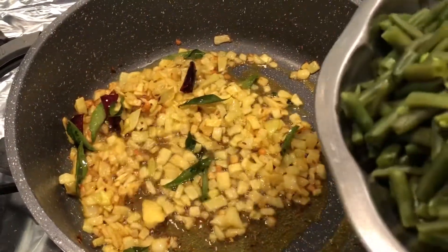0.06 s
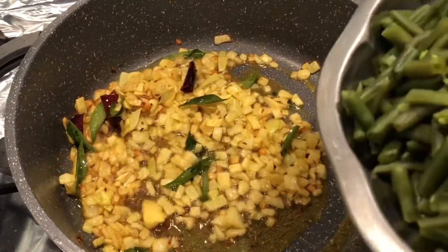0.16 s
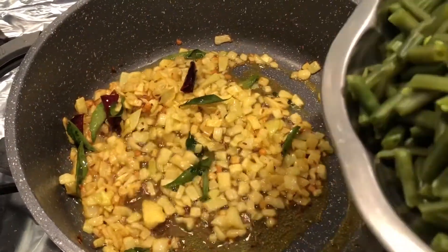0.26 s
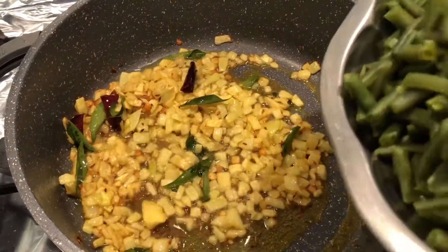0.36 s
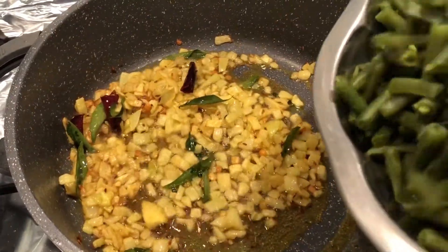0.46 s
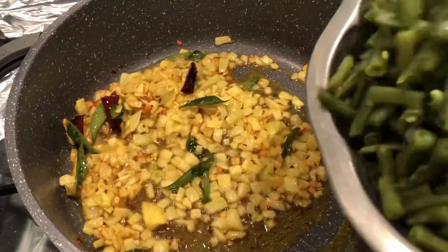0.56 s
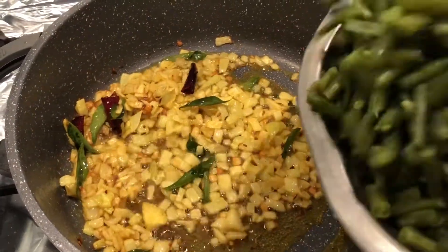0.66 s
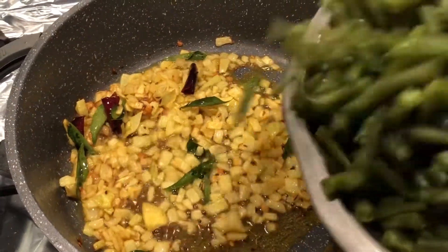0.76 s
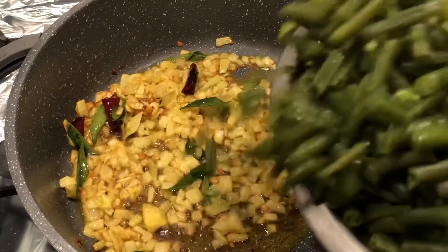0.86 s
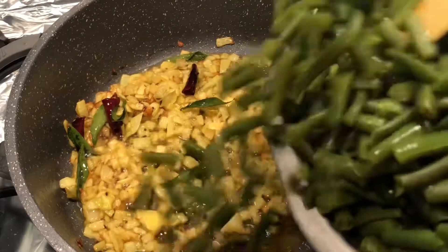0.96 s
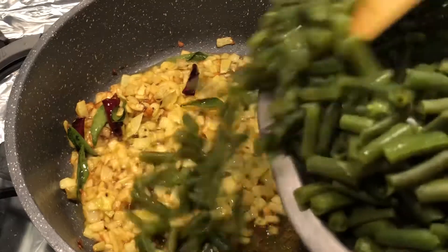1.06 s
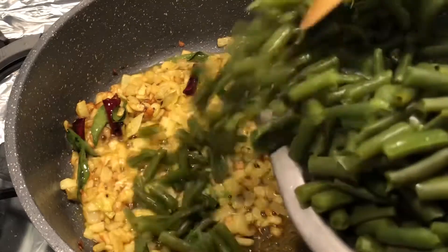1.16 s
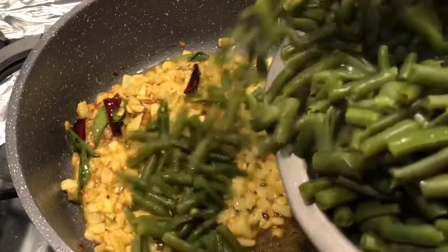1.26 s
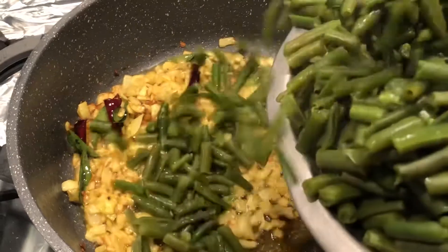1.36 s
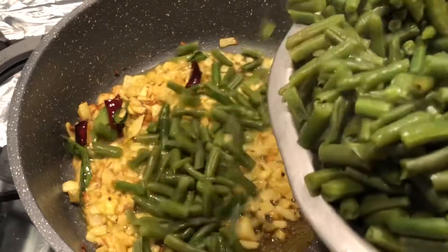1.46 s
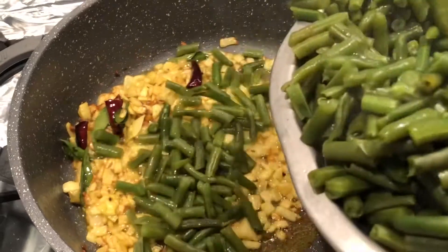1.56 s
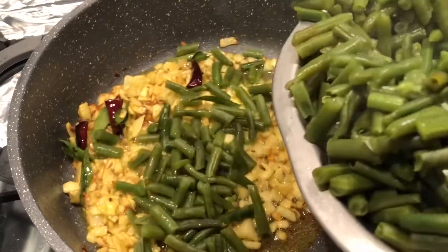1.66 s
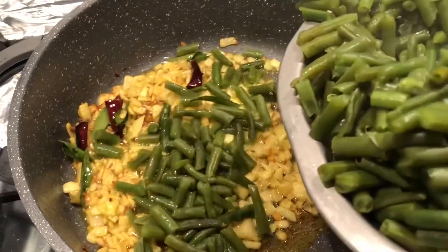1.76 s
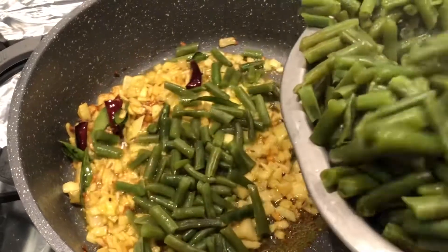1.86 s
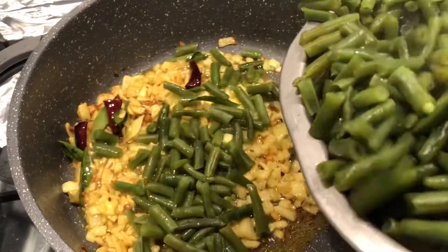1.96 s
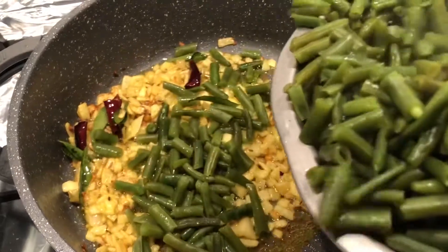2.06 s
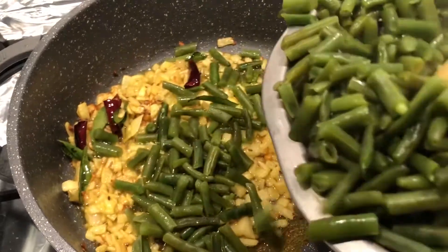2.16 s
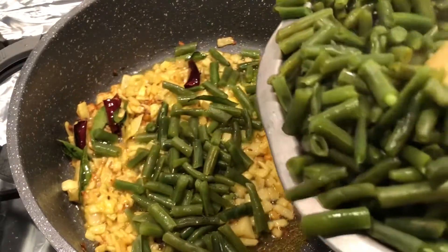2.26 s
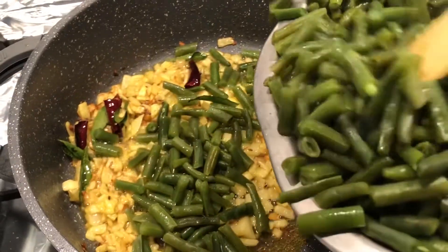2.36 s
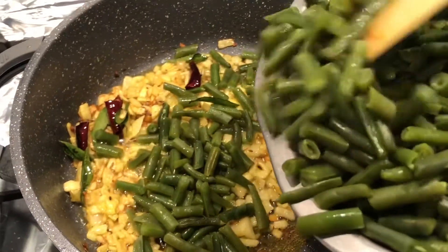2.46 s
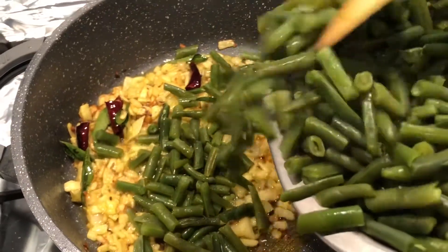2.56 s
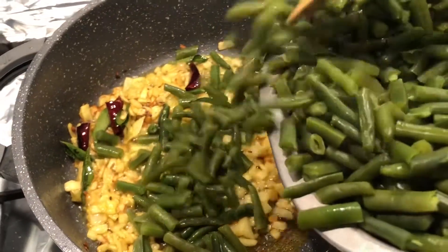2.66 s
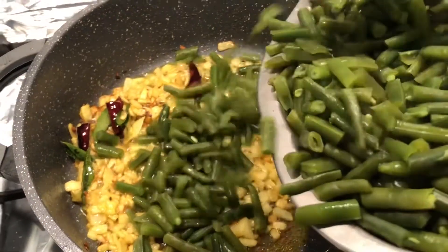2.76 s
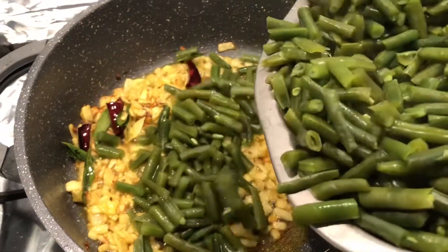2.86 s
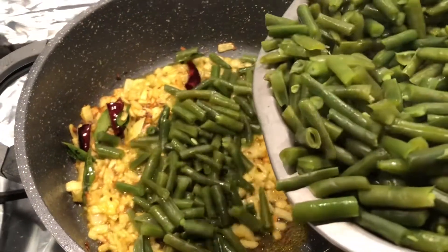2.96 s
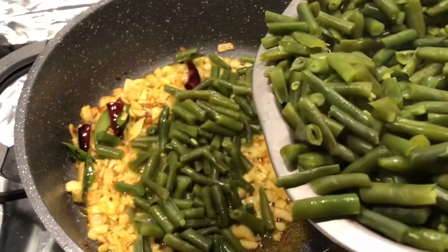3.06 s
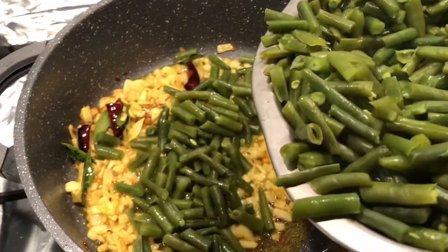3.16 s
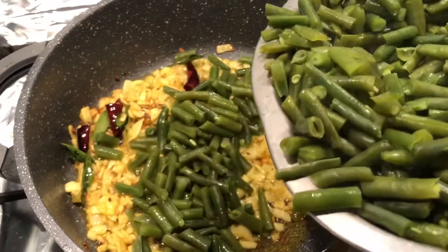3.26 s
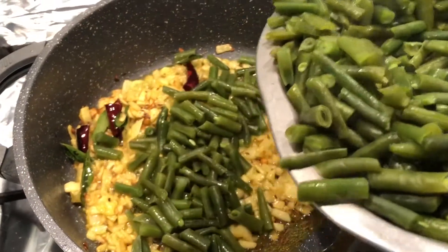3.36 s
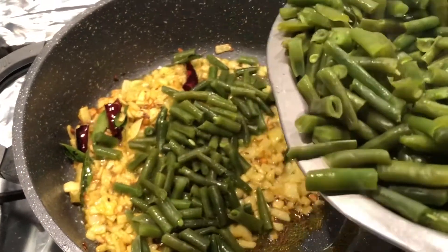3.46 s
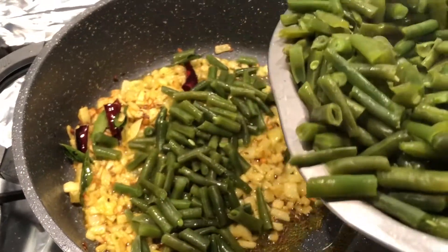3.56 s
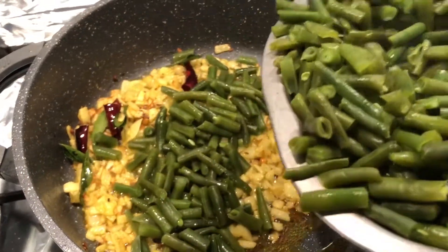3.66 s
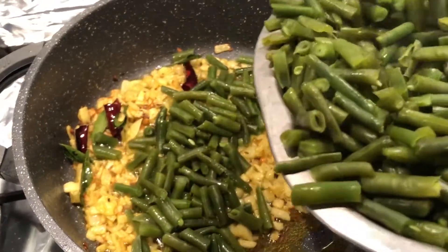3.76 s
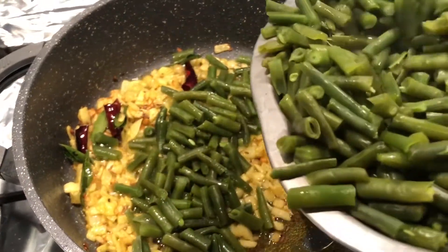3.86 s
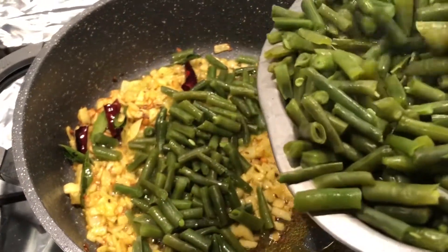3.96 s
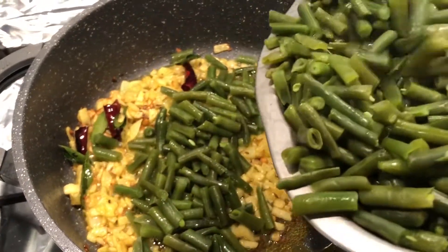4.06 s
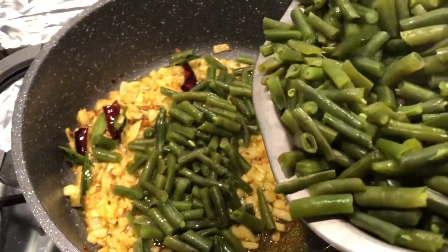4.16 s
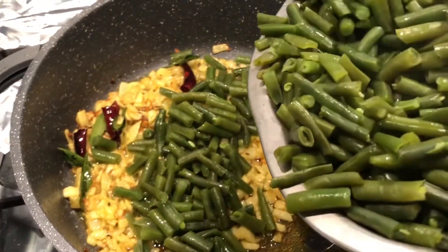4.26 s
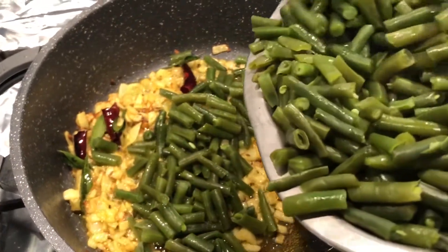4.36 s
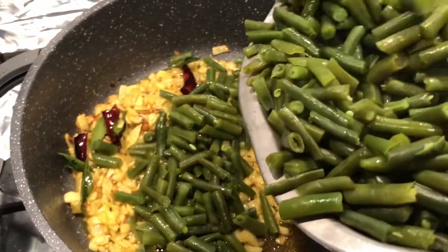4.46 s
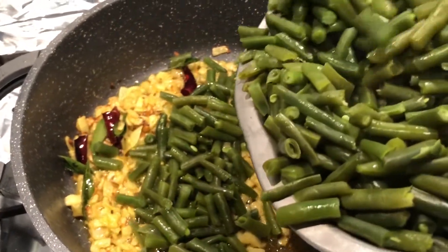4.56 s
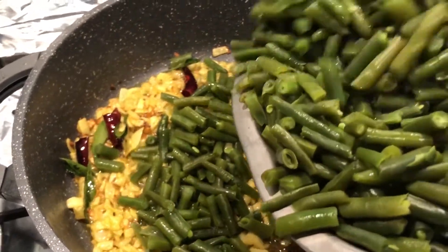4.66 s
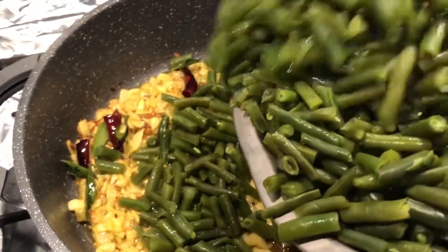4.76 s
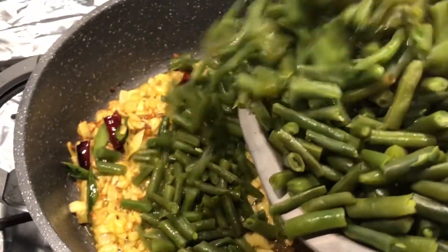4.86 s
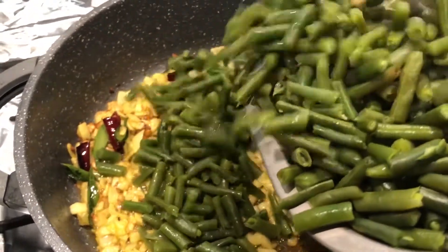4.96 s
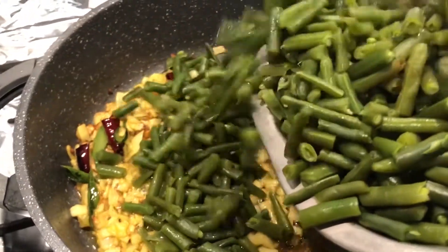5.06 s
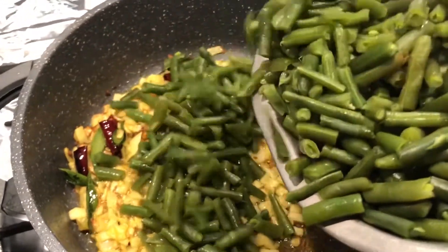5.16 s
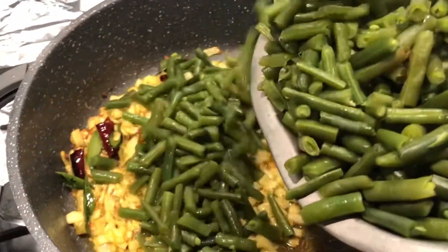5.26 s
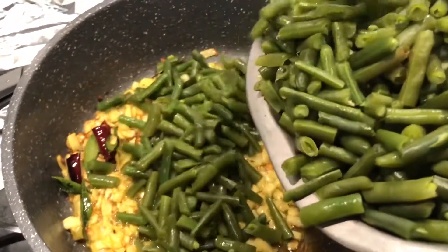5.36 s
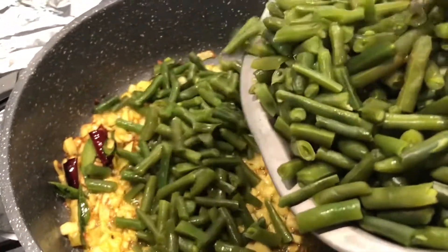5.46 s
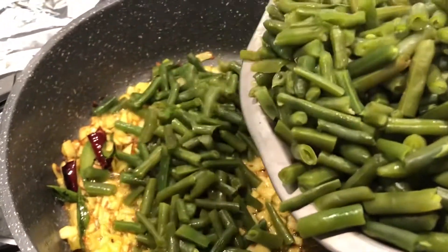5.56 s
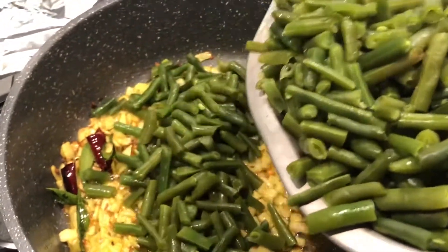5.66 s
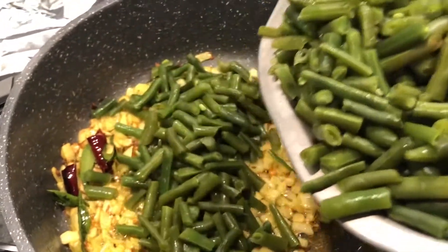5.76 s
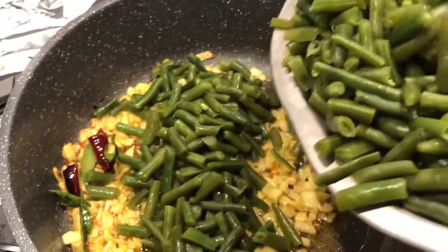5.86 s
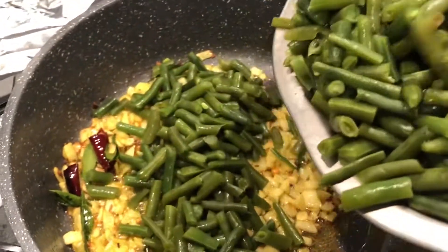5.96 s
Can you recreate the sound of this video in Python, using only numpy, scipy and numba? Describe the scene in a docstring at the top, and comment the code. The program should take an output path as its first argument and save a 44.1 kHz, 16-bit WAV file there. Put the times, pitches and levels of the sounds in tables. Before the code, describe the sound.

Close sizzling in a frying pan swells into a dense, popping crackle as wet green beans are pushed in with a spatula.

```python
"""A fine fizz of onions in hot oil, close by at the stove; then wet beans slide into the deep pan and the
oil boils up. Bursting steam bubbles make a hiss, a dense crackle and single pops, steam whistles faintly
between the beans, and the boiling hums in the pan. Landing beans shake the pan on its stand and a spatula
knocks now and then. One microphone, with the burner and the kitchen rumbling low behind it all."""
import sys
import numpy as np
from scipy import signal
from scipy.fft import rfft, irfft, next_fast_len
from scipy.io import wavfile
from scipy.ndimage import uniform_filter1d
from numba import njit

SR = 44100
rng = np.random.default_rng(int(sys.argv[2]) if len(sys.argv) > 2 else 0)


def waveform_to_disk(signal):
    """Save audio, clipped to [-1, 1], as 16-bit WAV at the path in sys.argv[1]."""
    frames = np.transpose(np.atleast_2d(signal))
    scaled = np.clip(frames, -1, 1) * 32767
    samples = np.round(scaled).astype(np.int16)
    wavfile.write(sys.argv[1], SR, samples)


N = 265614

# spectrum of the boiling, for both hiss and crackle: (frequency [Hz], level [dB])
BOIL_SPECTRUM = [(1000, -42), (1700, -15), (2090, -14), (2920, -8.5), (3930, -4.5), (5290, -0.5),
                 (9950, -1), (13300, -4), (15000, -2.5), (15700, -2)]
# heaps of beans landing in the pan: (start [s], end [s], stand shudder [dB], floor patter [dB])
BEAN_HEAPS = [(.8, 1.023, -63, -48), (1.056, 1.48, -51.5, -50.5), (2.26, 2.33, -58, -61.5),
              (2.67, 2.82, -56, -58), (4.767, 4.92, -60, -53), (4.98, 5.22, -60, -57)]
TIME = np.arange(N) / SR
BEANS_IN_S = BEAN_HEAPS[0][0]


def undb(db):
    return 10 ** (np.asarray(db) / 20)


def at_rms(x, db):
    return x * undb(db) / np.sqrt(np.mean(x ** 2))


def spectrum_db(points, hz):
    """A spectrum read on a log-frequency axis."""
    point_hz, db = np.transpose(points)
    return np.interp(np.log(hz), np.log(point_hz), db)


def coloured_noise(points):
    """Noise with the given spectrum."""
    size = next_fast_len(N)
    hz = np.arange(size // 2 + 1) * SR / size + 1
    return irfft(rfft(rng.standard_normal(size)) * undb(spectrum_db(points, hz)), size)[:N]


def wander(rate_hz):
    """Random steps, smoothed twice; their spread is near 1."""
    hold = int(SR / rate_hz)
    steps = np.repeat(rng.standard_normal(N // hold + 1), hold)
    return 1.69 * uniform_filter1d(uniform_filter1d(steps, hold), hold)[:N]


def resonance(x, hz, width_hz):
    """A resonance with gain 1 at its centre."""
    return signal.lfilter(*signal.iirpeak(hz, hz / width_hz, fs=SR), x)


@njit
def bursts(times, gain, hz, cycles, phase):
    """Tone bursts that peak at their times and die away, gliding slightly upward."""
    out = np.zeros(N)
    for k in range(len(times)):
        rise = .2 * cycles[k] / hz[k] * SR
        start = int(times[k] * SR - rise)
        for i in range(max(0, -start), min(int(9 * rise) + 2, N - start)):
            age = i / rise
            angle = phase[k] + 2 * np.pi * hz[k] * (i - rise) / SR * (1 + 0.0049 * age)
            out[start + i] += gain[k] * age * np.exp(1 - age) * np.sin(angle)
    return out


def in_pan(times, gain, hz, cycles, echo_db, t60_s, spots):
    """Bursts from several spots in the pan; the walls smear each spot in its own way for a few ms."""
    times, gain, hz, cycles = (column * np.ones(len(times)) for column in (times, gain, hz, cycles))
    phase, place = rng.random((len(times), 2)).T
    t = np.arange(int(t60_s * SR)) / SR
    out = 0
    for spot in range(spots):
        walls = rng.standard_normal(len(t)) * np.minimum(t / 0.00076, 1) * undb(echo_db - 60 * t / t60_s)
        walls[0] = 1  # the direct path to the microphone
        here = (place * spots).astype(int) == spot
        direct = bursts(times[here], gain[here], hz[here], cycles[here], 2 * np.pi * phase[here])
        out = out + signal.oaconvolve(direct, walls)[:N]
    return out


def kitchen_rumble():
    """Room tone: the burner and the kitchen rumble behind the pan."""
    # burner and room noise: (frequency [Hz], level [dB])
    rumble_spectrum = [(20, -30), (36, 0), (55, -1.5), (100, 6), (128, -1), (150, -10), (250, -12),
                       (420, -31), (800, -17), (2000, -9.5), (3200, -18.5)]
    return at_rms(coloured_noise(rumble_spectrum) * undb(0.65 * wander(5)), -55.5)


def landing_beans(rise_s=0.26, fall_s=0.21):
    """The pan shudders on its stand and its floor drums; both swell with each heap of beans."""
    shudder_db, patter_db = -79, -59.5  # between the heaps
    for start, end, heap_shudder_db, heap_patter_db in BEAN_HEAPS:
        fade_db = 20 * np.maximum((start - TIME) / rise_s, (TIME - end) / fall_s).clip(0)
        shudder_db = np.maximum(shudder_db, heap_shudder_db - fade_db)
        patter_db = np.maximum(patter_db, heap_patter_db - fade_db)
    stand_hz = 64.6 + 1.4 * wander(8)
    shudder = np.sin(2 * np.pi * np.cumsum(stand_hz) / SR) * undb(2.6 * wander(14))
    taps = rng.standard_normal(N) * undb(1.2 * wander(24.83))
    floor_modes = [(196, 25, 1), (130, 90, .5), (300, 150, .15), (600, 130, .9)]
    patter = sum(gain * resonance(taps, hz, width_hz) for hz, width_hz, gain in floor_modes)
    return undb(shudder_db) * at_rms(shudder, -0.5) + undb(patter_db) * at_rms(patter, 2.9)


def knocks():
    """Each knock is a dull thud with the short woody tick of the contact."""
    # knocks of spatula, steel plate and beans: (time [s], level [dB], pitch [Hz], length [cycles])
    contacts = [(.465, -43, 332, 3.4), (.648, -41, 290, 3.2), (.68, -42, 260, 2.7), (.785, -38.5, 557, 6.5),
                (1.185, -33.5, 600, 13), (1.647, -27, 1150, 3), (2.215, -41, 170, 2.2),
                (2.645, -33.5, 330, 1.1), (3.005, -38, 250, 1.7), (3.375, -29.5, 960, 5.3),
                (3.477, -27.5, 1090, 5.7), (3.6135, -33, 1300, 5), (3.615, -24.5, 348, 1.7),
                (3.623, -32, 170, 1.5), (3.665, -30.5, 1000, 9.9), (3.963, -30, 1150, 3.6),
                (3.983, -32, 1100, 5), (4.12, -47, 320, 2.4), (4.138, -37, 1300, 3),
                (4.299, -26.5, 1000, 3.9), (4.325, -32, 1350, 3), (4.365, -37, 514, 4.8),
                (4.68, -31, 1080, 6.3), (4.687, -33.5, 690, 7.8), (4.733, -35, 530, 5.1),
                (4.88, -47, 203, 16)]
    times, db, hz, cycles = np.transpose(contacts)
    thuds = in_pan(times, undb(db), hz, cycles, echo_db=-60, t60_s=0.046, spots=3)
    tick_gain = 2 * undb(db) * np.minimum(cycles ** -1.5, 1)
    ticks = in_pan(times - .001, tick_gain, hz=1200, cycles=2, echo_db=-35, t60_s=.03, spots=3)
    return thuds + ticks


def pan_hum(dry_db=-48.5, wet_db=-44.5, rise_s=0.21):
    """The boiling shakes the pan floor in small uneven blows, harder once the beans are in."""
    # resonances of the pan: (frequency [Hz], width [Hz], level [dB])
    pan_modes = [(341.4, 6.4, -7), (585.4, 58, -3), (683, 17, -11), (960, 15, 0), (1058.4, 61, 0.5),
                 (1223, 88, -8), (1515, 120, -6.5)]
    dryness = np.exp(-np.maximum(TIME - BEANS_IN_S, 0) / rise_s)
    hum_db = wet_db + (dry_db - wet_db) * dryness + 0.5 * wander(7)
    blows = undb(1.28 * wander(70))
    hum = sum(undb(db) * resonance(blows * rng.standard_normal(N), hz, width_hz)
              for hz, width_hz, db in pan_modes)
    return undb(hum_db) * at_rms(hum, 0.1)


def onion_fizz():
    """Tiny steam bubbles burst on the onions in a fine, even fizz."""
    # the fizz: (frequency [Hz], level [dB])
    fizz_spectrum = [(1000, -61), (1700, -0.5), (2070, -3.5), (2920, -5), (3480, -1), (5910, -9.5),
                     (10800, -0.5), (13500, 0.5), (15700, 6.5)]
    return at_rms(coloured_noise(fizz_spectrum) * undb(.5 * wander(36)), -37.5)


def steam_vents(fade_s=0.17):
    """Steam sputters and whistles faintly through gaps between the beans."""
    # steam jets: (start [s], end [s], pitch [Hz], width [Hz], level relative to the boiling [dB])
    jets = [(.95, 1.65, 3000, 100, -24), (0.83, 1.4, 3450, 120, -26), (1.2, 2.1, 5400, 250, -13.5),
            (0.96, 1.91, 8000, 2100, -9), (2.3, 3.4, 5400, 200, -12)]
    out = 0
    for start, end, hz, width_hz, db in jets:
        jet = resonance(rng.standard_normal(N) * undb(2.2 * wander(40)), hz, width_hz)
        fade = np.clip(np.minimum(TIME - start, end - TIME) / fade_s, 0, 1)
        out = out + at_rms(jet, db) * fade
    return out


def boil_hiss(brightness):
    """Each band of the hiss flickers by itself as patches of food boil up and calm down."""
    noise = coloured_noise(BOIL_SPECTRUM)
    bands_hz = 1700 * 1.25 ** np.arange(11)
    hiss = at_rms(sum(resonance(noise, hz, .3 * hz) * undb(1.6 * wander(25.02)) for hz in bands_hz), 0.22)
    lows = signal.lfilter(*signal.butter(1, 6500, fs=SR), hiss)
    return undb(-.7 * brightness) * lows + undb(0.69 * brightness) * (hiss - lows)


def boil_crackle(brightness, count=22000):
    """Countless steam bubbles of every size burst in the oil."""
    when, pitch, size, length = rng.random((count, 4)).T
    hz = 1500 * (16000 / 1500) ** pitch ** .7
    sample = (when * N).astype(int)
    db = spectrum_db(BOIL_SPECTRUM, hz) + (brightness[sample] + 1.5) * np.log2(hz / 7000)
    db -= 3.9 * length ** 2.4  # long ringers are softer
    db += np.minimum(-3.7 * np.log(1 - size), 13.5)  # a few are much louder
    db += 1.45 * wander(90)[sample]  # small flurries
    cycles = hz / 2200 * 2 ** (3.2 * length ** 1.5 - .9) + 1.2
    bubbles = in_pan(when * N / SR, undb(db), hz, cycles, echo_db=-21.5, t60_s=0.017, spots=6)
    return at_rms(bubbles, 0.33)


def small_pops(count=55, from_s=.92, low_hz=3940, high_hz=14900, shortest_ms=.55):
    """Rows of chance pops once the wet beans are in; low or long-ringing ones are softer."""
    when, drop, pitch, length = rng.random((count, 4)).T
    times = from_s + when * (N / SR - from_s)
    hz = low_hz * (high_hz / low_hz) ** pitch
    cycles = hz * shortest_ms / 1000 * (1 + 2.8 * length ** 2)
    db = -12 - 0.5 * drop - 2.8 * length ** 2 - 4.5 * (1 - pitch)
    return np.transpose([times, db, hz, cycles])


def pops():
    """A bubble rings at its pitch and cracks as its skin tears; short, loud pops crack most."""
    # the loudest bubbles: (time [s], level [dB], pitch [Hz], length [cycles])
    loud_pops = [(0.3609, -16.5, 3700, 3.8), (0.7268, -20, 4270, 1.8), (0.775, -11.5, 11670, 5.2),
                 (0.7892, -23, 3600, 3.5), (0.9239, -6.5, 9600, 3.5), (0.9367, -17, 6370, 17.1),
                 (1.0083, -7.5, 8900, 8.7), (1.0497, -15, 7840, 7.7), (1.1255, -16.5, 6000, 24),
                 (1.172, -8.5, 7840, 4.2), (1.3358, -9.9, 15030, 9.8), (1.3817, -12, 5300, 5.1),
                 (1.4228, -8, 9730, 4.9), (1.4704, -7.8, 14600, 8.2), (1.533, -4.5, 8700, 4.9),
                 (1.5955, -13, 9910, 9.8), (1.6485, -14, 3200, 2.5), (1.6516, -10, 11150, 3.4),
                 (1.659, 1.5, 12800, 3.3), (1.7629, -15, 6800, 2.3), (1.8352, -11, 9390, 4.1),
                 (1.903, -4, 13950, 6.5), (1.9096, -12, 9730, 6), (1.922, -16, 4070, 8.8),
                 (1.9253, -13.5, 6030, 15.1), (1.9426, 1, 14600, 6), (1.9605, -9, 8440, 3.8),
                 (2.1171, -5, 15420, 9.0), (2.1234, -2, 9200, 3.2), (2.1341, -19, 1990, 3.2),
                 (2.1787, -9.5, 14130, 11), (2.1901, -4.5, 9800, 3.6), (2.2007, -11, 14380, 8.2),
                 (2.2136, -10, 14040, 7.8), (2.3182, -4.5, 13700, 9.9), (2.3573, -6, 7300, 3.1),
                 (2.3898, -8, 7360, 2.5), (2.4381, -9, 14340, 9.8), (2.5102, -12, 8910, 7.4),
                 (2.5278, -10.5, 5470, 3.5), (2.6153, -8, 5500, 2.7), (2.7259, -9, 4980, 7.1),
                 (2.8295, -14, 5640, 3.3), (2.9161, -14, 14000, 12.0), (2.9515, -11.5, 10380, 4.6),
                 (3.0223, -5, 8150, 2.3), (3.0902, -7, 9050, 7), (3.1371, -10, 7490, 5.7),
                 (3.1891, -15, 4450, 15), (3.3759, -7, 14300, 8.8), (3.6373, -4, 11500, 3.5),
                 (3.6785, -15, 14210, 11), (3.7398, -8.5, 9700, 4.7), (3.8002, -16, 10100, 13),
                 (3.9719, -17, 11370, 7.6), (4.0813, -11, 11710, 4.1), (4.153, -11, 14770, 14),
                 (4.2117, -4, 9390, 3.5), (4.2785, -1, 14700, 6.5), (4.2981, -6, 7840, 2.6),
                 (4.3183, -7, 8900, 3.7), (4.3424, -11.5, 5670, 6.8), (4.4537, -12, 6980, 7.2),
                 (4.5101, -22.5, 2150, 7.3), (4.5134, -3.5, 10340, 3), (4.5508, -11, 11240, 4.2),
                 (4.5913, -11, 7360, 2.9), (4.662, -20.5, 3500, 3.5), (4.7323, -17, 8270, 3.4),
                 (4.9521, -8.5, 8300, 4.8), (4.9651, -12, 11070, 10), (4.9864, -5, 4670, 1.6),
                 (5.0745, -6, 14000, 6.6), (5.1078, -11, 9700, 6.3), (5.1605, -4.5, 4600, 1.1),
                 (5.1905, -12, 7360, 4.1), (5.2721, -5, 14340, 7.7), (5.3502, -7, 5840, 7.7),
                 (5.4458, -15, 14560, 9.3), (5.4684, -13, 11580, 10), (5.5587, -12, 6420, 5.4),
                 (5.7099, -19, 4500, 13), (5.7313, 0.5, 7300, 2.7), (5.8224, -9.5, 5730, 2.4),
                 (5.8609, -11.5, 5160, 6.3), (5.87, -2.5, 10160, 8.5), (5.8947, -11.8, 7670, 4.3),
                 (5.9713, -18.5, 6000, 10.4)]
    times, db, hz, cycles = np.vstack([loud_pops, small_pops()]).T
    rings = in_pan(times, undb(db - 2.74), hz, cycles, echo_db=-27, t60_s=0.035, spots=8)
    tear_gain = undb(0.81 * db - 0.45) * np.minimum(hz / cycles / 1500, 1)
    cracks = in_pan(times, tear_gain, np.maximum(hz, 9000), cycles=1.2, echo_db=-20, t60_s=0.0075, spots=8)
    # five neighbouring bubbles go off just after, smaller and at nearby pitches
    lag, detune, drop = rng.random((len(times), 5, 3)).T
    near_times = (times + .0004 + .004 * lag ** 1.3).ravel()
    near_gain = undb(db - 12.5 - 8.1 * drop - 4.5 * lag).ravel()
    near_hz = np.clip(hz * 2 ** (1.1 * detune - .4), 2000, 15500).ravel()
    spatter = in_pan(near_times, near_gain, near_hz, near_hz / 1500, echo_db=-16, t60_s=.012, spots=4)
    low_cut = signal.butter(2, 1300, "highpass", fs=SR, output="sos")
    return signal.sosfilt(low_cut, rings + cracks + spatter)


def boiling_oil():
    """Water boils off in the oil as hiss, crackle and jets of steam; onions alone crackle less."""
    # course of the boiling: (time [s], level [dB], brightness [dB per octave of crackle])
    boil_course = [(0.0, -40, 1), (0.65, -40.5, 0.5), (0.89, -37.5, 1.5), (0.94, -31.5, 1.5),
                   (1.03, -27.5, 2.5), (1.2, -27.5, 1.7), (1.5, -27.5, 1.5), (1.8, -28, 0), (2.2, -30.5, 1),
                   (2.55, -31, -1), (2.72, -35, -1.5), (3.15, -31.5, 0), (3.6, -33.5, -3.5),
                   (4.05, -32, 0.5), (4.3, -32.5, 1), (5.0, -32, -0.8), (5.85, -32, -0.5),
                   (6.02, -34.5, -3.5)]
    times, db, tilt = np.transpose(boil_course)
    boil_db = np.interp(TIME, times, db)
    brightness = np.interp(TIME, times, tilt) + 0.76 * wander(9)
    share_db = np.where(TIME < BEANS_IN_S, -7, -2 + 0.05 * np.maximum(boil_db + 32, 0))
    crackle_share = np.minimum(undb(share_db + 0.9 * wander(6)), .98)
    hiss = np.sqrt(1 - crackle_share ** 2) * boil_hiss(brightness)
    crackle = crackle_share * boil_crackle(brightness)
    return undb(boil_db) * (hiss + crackle + steam_vents())


def scene():
    """The pan up close over the room tone, in mono."""
    frying = boiling_oil() + onion_fizz() + pops() + pan_hum()
    return (frying + landing_beans() + knocks() + kitchen_rumble())[None]


def record(dry, low_hz=34, ceiling=1.15, top_hz=15700):
    """The microphone chain drops the lowest rumble, rounds the loudest pops and cuts the top."""
    low_cut = signal.sosfilt(signal.butter(4, low_hz, "highpass", fs=SR, output="sos"), dry)
    rounded = ceiling * np.tanh(low_cut / ceiling)
    return signal.sosfilt(signal.ellip(10, .2, 70, top_hz, fs=SR, output="sos"), rounded)


dry = scene()
out = record(dry)
waveform_to_disk(out)
```